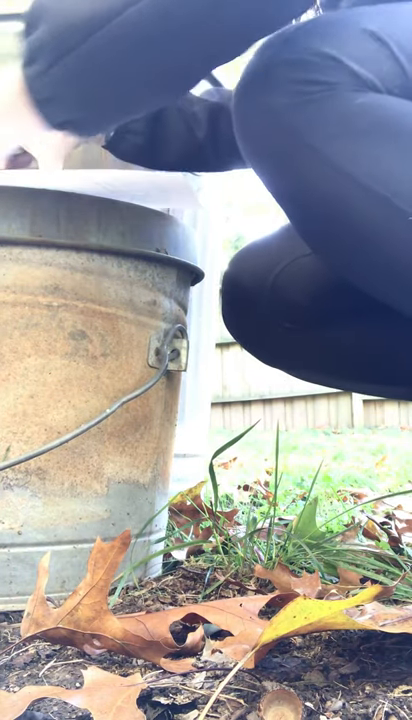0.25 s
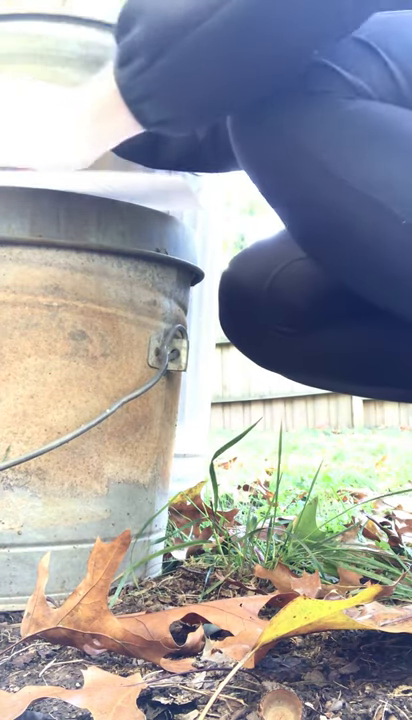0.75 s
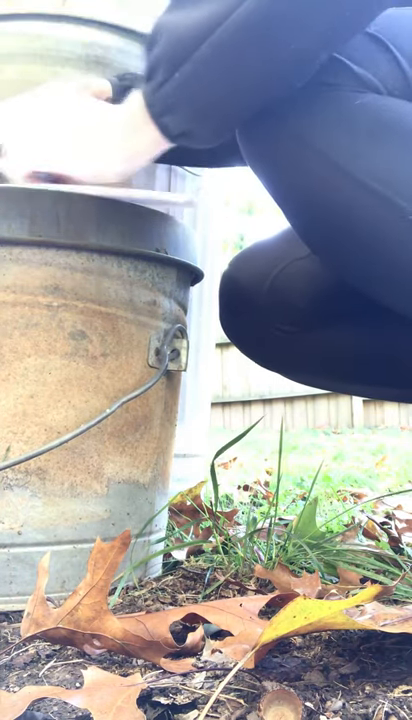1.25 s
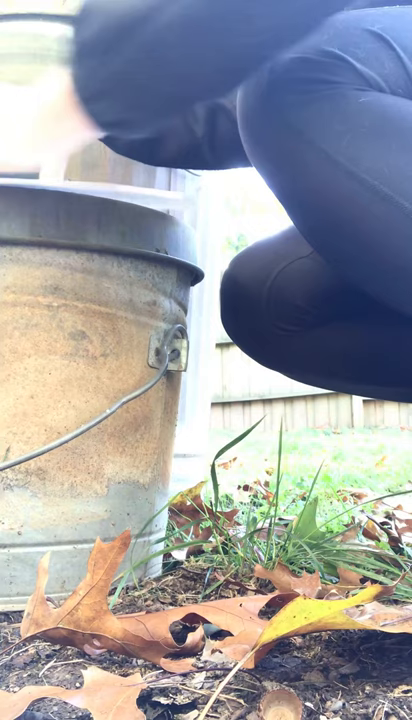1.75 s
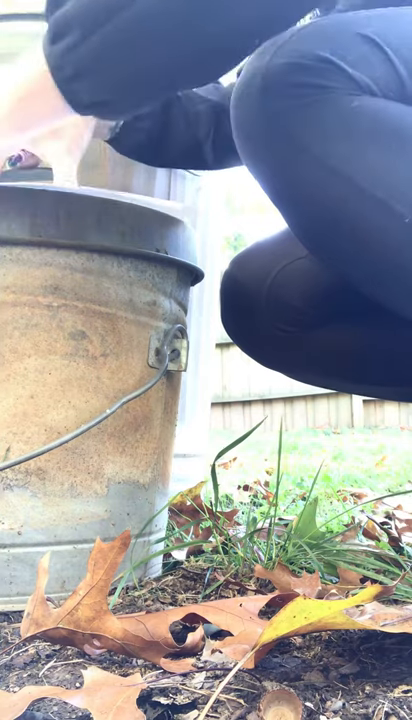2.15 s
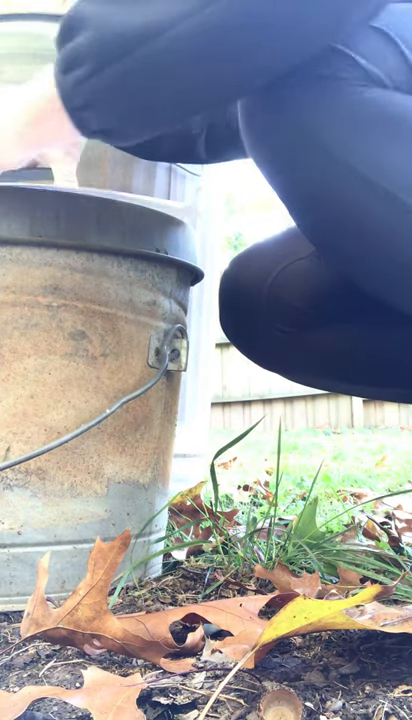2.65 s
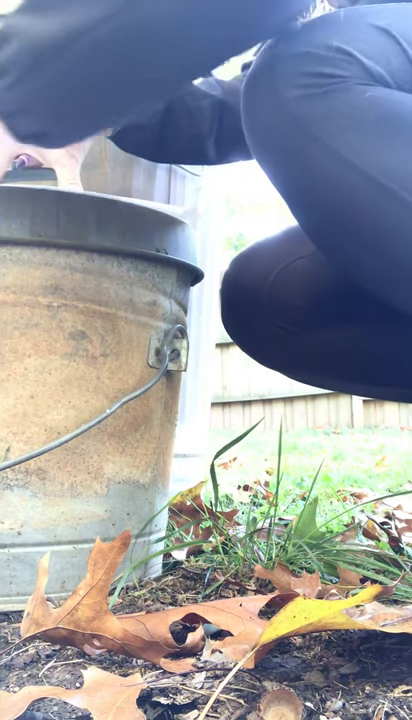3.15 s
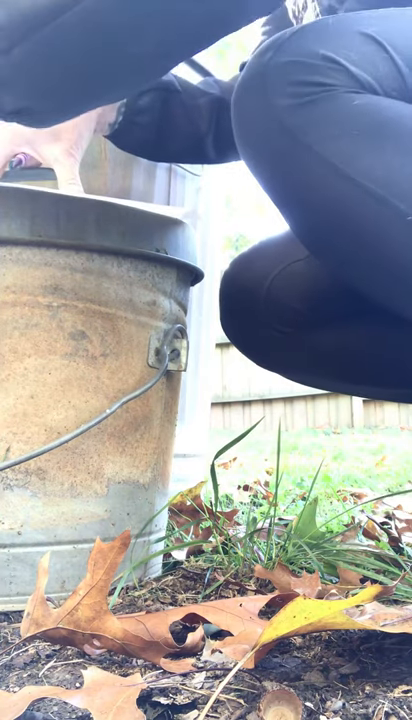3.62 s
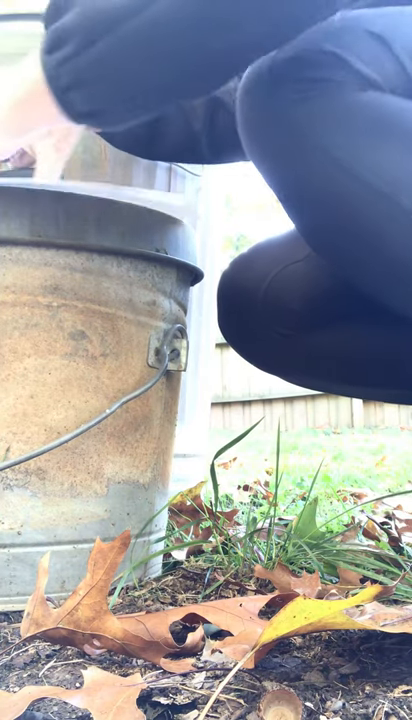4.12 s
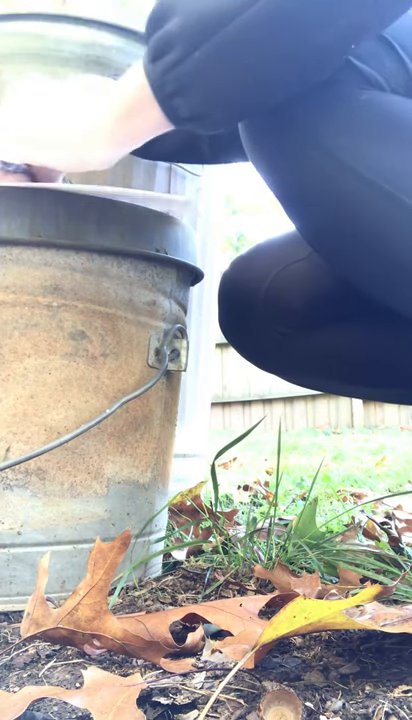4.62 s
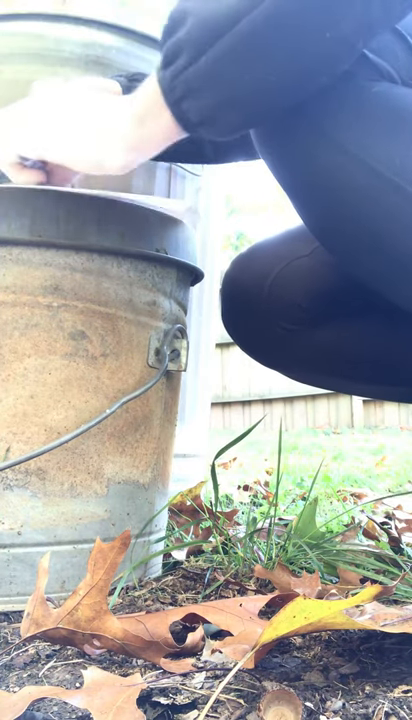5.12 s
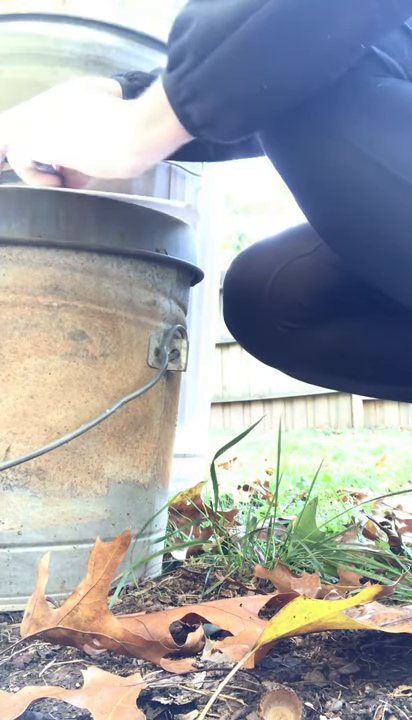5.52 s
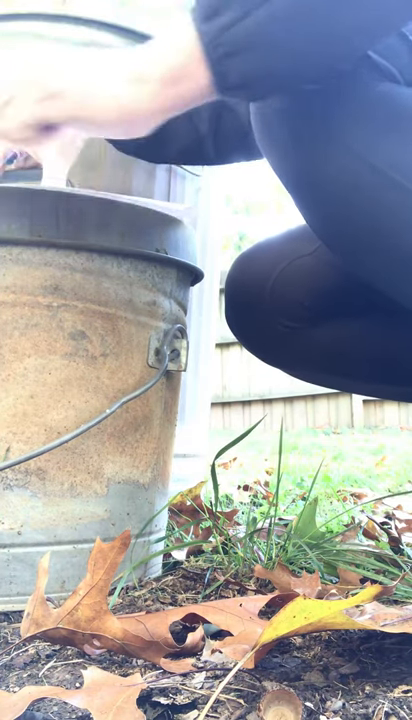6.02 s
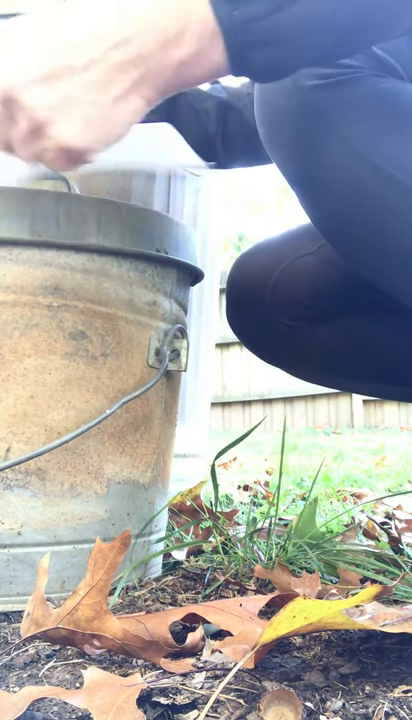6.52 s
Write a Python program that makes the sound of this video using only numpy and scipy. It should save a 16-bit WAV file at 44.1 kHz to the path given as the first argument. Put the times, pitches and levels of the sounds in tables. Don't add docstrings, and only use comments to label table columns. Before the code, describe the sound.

Close up outdoors, a crayon is rubbed in rapid strokes across paper on a metal bin lid, each a dry hiss with papery grit. Bumps knock the lid with dull, short hollow thumps. After about three seconds the strokes become short, spaced touch-ups, then harder knocks near the rim. Finally the sheet is peeled away with crisp crackles and snaps. Low traffic rumbles far behind.

```python
import sys
import numpy as np
from scipy import signal
from scipy.fft import rfft, irfft, next_fast_len
from scipy.io import wavfile

SR = 44100
rng = np.random.default_rng(int(sys.argv[2]) if len(sys.argv) > 2 else 0)


def volts(x):
    e = np.asarray(x, float) / 20
    return 10 ** e


def bounce(signal):
    frames = np.transpose(np.atleast_2d(signal))
    limited = np.clip(frames, -1, 1)
    pcm = np.round(limited * 32767).astype(np.int16)
    wavfile.write(sys.argv[1], SR, pcm)


N = 298557
MODE_FLICKER_DB = 1.5


def rms_one(x):
    return x / np.sqrt(np.mean(x ** 2) + 1e-20)


def in_time(rows):
    s, *columns = np.transpose(rows)
    return [np.interp(np.arange(N) / SR, s, c) for c in columns]


def coloured(x, spectrum):
    hz, level_db = np.transpose(spectrum)
    size = next_fast_len(N)
    bins_hz = np.arange(1, size // 2 + 2) * SR / size
    gain = volts(np.interp(np.log(bins_hz), np.log(hz), level_db))
    return rms_one(irfft(rfft(x, size) * gain, size)[:N])


def high_pass(x, hz):
    return signal.sosfilt(signal.butter(4, hz, "high", fs=SR, output="sos"), x)


def drift(rate):
    r = np.exp(-2 * np.pi * rate / SR)
    noise = rng.standard_normal(N + SR)
    return rms_one(signal.lfilter([1], [1, -2 * r, r * r], noise)[SR:])


def resonance(x, hz, width_hz):
    r = np.exp(-np.pi * width_hz / SR)
    top = np.array([1, 0, -1]) * (1 - r * r) / 2
    return signal.lfilter(top, [1, -2 * r * np.cos(2 * np.pi * hz / SR), r * r], x)


def body(x, modes, flicker_db=0.0):
    out = np.zeros(N)
    for k, (hz, width_hz, db) in enumerate(modes):
        out += (-1) ** k * volts(db + flicker_db * drift(13.0)) * resonance(x, hz, width_hz)
    return out


def grains(per_s, spread_db):
    sizes = volts(spread_db * np.minimum(rng.exponential(1, N), 5)) * rng.choice([-1, 1], N)
    return rms_one(sizes * (rng.random(N) < per_s / SR)) + 1e-9


def bursts(times, peaks, t60, rise_s):
    out, t = np.zeros(N), np.arange(int(.15 * SR)) / SR
    for at, peak, fall in np.broadcast((times * SR).astype(int), peaks, t60):
        shape = peak * (1 - np.exp(-t / rise_s)) * volts(-60 * t / fall)
        out[at:at + len(t)] += shape[:N - at]
    return out + 1e-12


def each_at_pitch(times, peaks, t60, drive, pitches_hz, width_hz):
    out, t = np.zeros(N), np.arange(int(.1 * SR)) / SR
    for at, peak, fall, hz in zip((times * SR).astype(int), peaks, t60, pitches_hz):
        part = drive[at:at + len(t)] * (peak * volts(-60 * t / fall))[:N - at]
        out[at:at + len(t)] += resonance(resonance(part, hz, width_hz), hz, 0.75 * width_hz)
    return out


# t/s, rumble level/dB, drone over rumble/dB
TRAFFIC = [(0.0, -51.5, 5), (0.32, -48, 0.5), (0.7, -53, 6), (1.15, -44, 2.5), (1.41, -40, -11),
           (1.55, -43, 2), (1.92, -40, 3), (2.13, -43, -3), (2.4, -43, 2), (3.05, -45.5, -6),
           (4.05, -41.5, 9), (4.4, -43, -7.5), (4.8, -41.5, 5.5), (5.2, -48.5, -8), (5.68, -50, 11.5),
           (5.84, -50, 1.5), (6.01, -47, 5.5), (6.77, -44, 1)]
# f/Hz, level/dB per Hz
RUMBLE = [(12, -20), (20, -2.5), (44, -6.5), (59, -1), (70, -3.5), (118, -6), (157, -16), (236, -19),
          (300, -21), (390, -25), (660, -120)]
DRONE_HZ, DRONE_WIDTH_HZ = 62.12, 4.1


def traffic():
    rumble_db, share_db = in_time(TRAFFIC)
    noise = rng.standard_normal(N + SR)
    drone = resonance(noise, DRONE_HZ, DRONE_WIDTH_HZ)
    drone = resonance(drone, DRONE_HZ, 1.45 * DRONE_WIDTH_HZ)[SR:]
    rumble = coloured(rng.standard_normal(N), RUMBLE)
    return volts(rumble_db + share_db) * rms_one(drone) + volts(rumble_db + 2.5) * rumble


# f/Hz, level/dB per Hz
AIR = [(88, -49), (150, 3.5), (217, -7.5), (327, -6.5), (785, -15.5), (917, -14), (1610, -18.5),
       (2430, -32), (3250, -25.5), (6810, -32), (10500, -54), (12500, -70), (15700, -62)]


def garden_air():
    return volts(-58.5) * coloured(rng.standard_normal(N), AIR)


TURN_S, SPEED_POWER = 0.075, 2.34


def strokes(rows, levels_db, builds_db=0.0, lag_s=0.0015):
    out = np.zeros(N + SR)
    for (start, length, *_), db in zip(rows, levels_db):
        t = np.arange(0, length, 1 / SR)
        to_turn = np.minimum(t, length - t) / min(TURN_S, length / 2)
        speed = np.sin(np.pi / 2 * np.clip(to_turn, 0, 1))
        at = int(start * SR)
        out[at:at + len(t)] += speed ** SPEED_POWER * volts(db + builds_db * (2 * t / length - 1.5))
    r = np.exp(-1 / (lag_s * SR))
    return signal.lfilter([1 - r], [1, -r], out[:N])


# t/s, length/s, wax hiss
# level/dB, grit level/dB, upper ring over grit/dB
STROKES = [(0.0, 0.062, -72, -54, -2.5), (0.076, 0.23, -65.5, -58, -0.5),
           (0.285, 0.17, -65.5, -62.5, -2), (0.451, 0.22, -62, -63, -7), (0.657, 0.13, -67.5, -61, -3),
           (0.796, 0.19, -67.5, -62.5, -1), (0.977, 0.13, -65, -69, -5), (1.082, 0.16, -60, -60.5, 4),
           (1.217, 0.082, -66, -67, 2), (1.314, 0.13, -66.5, -63, 1), (1.417, 0.061, -72.5, -70, 0),
           (1.522, 0.33, -61, -58.5, -1.5), (1.868, 0.21, -66, -64, 0), (2.084, 0.13, -78, -62, -6),
           (2.201, 0.21, -64.5, -59.5, -1), (2.409, 0.19, -68.5, -63, -8),
           (2.599, 0.26, -64, -64.5, 1), (2.796, 0.34, -60.5, -58, 5), (3.152, 0.15, -68.5, -65, -1),
           (3.7, 0.27, -66, -71.5, -9), (3.957, 0.095, -70, -78, 0), (4.15, 0.11, -67, -75, -9),
                 (4.385, 0.15, -66.5, -65.5, 6), (4.648, 0.1, -65, -72, 11), (4.893, 0.076, -70, -55.5, 6),
                 (5.078, 0.11, -85, -46.5, -11), (5.27, 0.073, -72, -57, 3.5), (5.465, 0.081, -68, -61, 6),
                 (5.611, 0.12, -66.5, -54.5, 2), (5.99, 0.032, -73, -54, -5), (6.108, 0.045, -77, -50, -6),
                 (6.141, 0.063, -56, -47.5, -3), (6.335, 0.07, -60, -56, 2),
                 (6.437, 0.18, -65, -67.5, 11.5), (6.617, 0.078, -68, -45.5, -4),
                 (6.674, 0.092, -59, -49.5, -2)]
# t/s, length/s, grit level/dB, upper ring over grit/dB
RELIEF = [
    (0.086, 0.13, -61.5, 6),
    (0.573, 0.08, -60, -6),
    (1.568, 0.15, -61.5, 6),
    (2.695, 0.1, -54, 7.5),
    (2.94, 0.24, -56.5, -4),
    (5.071, 0.04, -64, 5),
]
# t/s, glide level on the paper/dB, weight level on the lid/dB
HAND = [(0, -71, -51.5), (0.5, -77.5, -51.5), (1.0, -70.5, -52), (1.45, -73.5, -55), (2.0, -72.5, -55),
        (2.7, -70, -61), (3.4, -71.5, -53.5), (3.9, -72, -51), (4.4, -70, -52.5), (4.85, -71.5, -51),
        (5.2, -72.5, -44.5), (5.55, -73.5, -50), (5.9, -75.5, -54), (6.25, -72, -46), (6.77, -70, -51.5)]
GRIT_LAG_S, GRIT_BUILDS_DB = 0.026, 1.5
DRUM_LAG_S, DRUM_FOLLOWS, DRUM_DB = 0.029, 0.53, -51
REST_GRIT_DB, REST_RING_DB = -18.5, -2


def hand():
    rows = STROKES
    _, _, hiss_db, grit_db, ring_db = np.transpose(rows)
    _, _, rough_db, rough_ring_db = np.transpose(RELIEF)
    glide_db, weight_db = in_time(HAND)
    rest_db = weight_db + REST_GRIT_DB

    hiss = strokes(rows, hiss_db) + volts(glide_db)
    grit_level = strokes(rows, grit_db, GRIT_BUILDS_DB, GRIT_LAG_S) + volts(rest_db)
    grit_level += strokes(RELIEF, rough_db, lag_s=GRIT_LAG_S)
    ring = strokes(rows, grit_db + ring_db, GRIT_BUILDS_DB, 0.5 * GRIT_LAG_S) + volts(rest_db + REST_RING_DB)
    ring += strokes(RELIEF, rough_db + rough_ring_db, lag_s=0.005)
    stroke_drum_db = DRUM_DB + DRUM_FOLLOWS * (grit_db - grit_db.mean())
    drum = strokes(rows, stroke_drum_db, GRIT_BUILDS_DB, DRUM_LAG_S) + volts(weight_db)
    return 20 * np.log10([hiss, grit_level, ring, drum])


# f/Hz, level/dB per Hz
HISS = [(800, -16), (1300, -10), (2500, -0.5), (3300, -9), (4600, -6.5), (7000, -6.5), (9200, -5.5),
        (10500, -11), (12000, -7.5), (14500, -12), (15700, -7), (16000, -51)]


def wax_hiss(hiss_db):
    fine = coloured(grains(12000 * volts(2.0 * drift(80)), spread_db=0.5), HISS)
    middle, top = high_pass(fine, 6800), high_pass(fine, 10300)
    fine = fine + (volts(1.5 * drift(22)) - 1) * middle + (volts(2.6 * drift(10)) - 1) * top
    return volts(hiss_db + 2.0) * fine


# f/Hz, width/Hz, level/dB
PAPER_LOWER = [(1730, 35, 1), (1957, 100, 1), (2200, 33, 7), (2410, 58, 3), (2620, 89, 3),
               (2883, 310, -2.5)]
# f/Hz, width/Hz, level/dB
PAPER_UPPER = [(3270, 240, -12), (3530, 92, 0.5), (3790, 120, -3.5), (4210, 170, 1.5), (4680, 135, 1.5),
               (4920, 320, -6), (5020, 113, 3), (5460, 240, -2), (6840, 720, -9.5)]


def grit(grit_db, ring_db):
    slips = grains(4000 * volts(3.0 * drift(40)), spread_db=1.5)
    lower = rms_one(high_pass(body(slips, PAPER_LOWER, MODE_FLICKER_DB), 1330))
    upper = rms_one(high_pass(body(slips, PAPER_UPPER, MODE_FLICKER_DB), 3570))
    return volts(grit_db - 0.5) * lower + volts(ring_db - 3.5) * upper


# t/s, peak level/dB, edge level/dB, thump level/dB
KNOCKS = [(0.189, -36.5, -6, -8), (0.611, -37, -13, -2), (0.761, -53, -25, -21), (0.915, -29.5, -9.5, -14),
          (0.938, -48, -5, -24), (1.172, -32, -14, -2.5), (1.39, -33.5, -24, -4), (1.43, -37.5, -18, -12),
          (1.474, -61, -15, -21), (1.703, -40, -2.5, -21), (1.982, -38, -13, -21), (2.543, -44, -12, -6),
          (2.692, -35.5, -29, -8), (3.829, -42, -34, -3), (3.908, -40, -1, -12), (3.937, -40, -10, -8),
          (4.209, -38.5, -26, -16), (4.478, -41, -13, -3), (4.7, -39.5, -28, -8), (0.71, -47, -15, -15),
          (1.011, -35.5, -19, -15), (2.298, -45, -5, -6)]
# t/s, peak level/dB, edge level/dB, thump level/dB
RIM_KNOCKS = [(4.93, -30.5, -16, -5.5), (5.08, -34, -18, -9), (5.138, -35, -4, -2.5),
              (5.296, -30.5, -29, -13), (5.503, -38.5, -26, 0), (5.665, -34, -12, -35),
              (5.985, -37.5, -18, -14), (6.145, -38, -14, -2), (6.184, -42, -11, 1.5),
              (6.368, -36, -22, -9), (6.729, -38, 3.5, 0)]
# f/Hz, width/Hz, level/dB
LID = [(263, 42, -9.5), (313, 28.2, 0.5), (347.6, 29, 2), (431, 31, -5.5), (475, 24.4, -6), (548, 20, -9),
       (621, 23, -7.5), (747.4, 13, -13.5), (882, 71, -15), (1107, 130, -16.5), (1363, 300, -21)]
# f/Hz, width/Hz, level/dB
RIM = [(202, 30, 0), (501, 51, 0.5), (630, 40, -12)]
RATTLE_T60_S, RIM_T60_S = 0.1, 0.25


def lid(drum_db):
    s, peak_db, edge_db, thump_db = np.transpose([*KNOCKS, *RIM_KNOCKS])
    drumming = rms_one(body(grains(2000, spread_db=2.5), LID, MODE_FLICKER_DB))
    rattle = grains(3000, spread_db=1.8)

    strike = volts(9.5) * bursts(s, volts(peak_db), 0.005, 0.001)
    shake = bursts(s, volts(peak_db), RATTLE_T60_S, 0.0069) * rattle
    low = body(strike + shake, LID[:6], MODE_FLICKER_DB)
    edge = body(bursts(s, volts(peak_db + edge_db), RATTLE_T60_S, 0.011) * rattle, LID[6:], MODE_FLICKER_DB)

    thump_peak = volts(peak_db + thump_db)
    push = volts(-12.0) * bursts(s, thump_peak, 0.0094, 0.0017)
    thump = resonance(push + bursts(s, thump_peak, 0.33 * RATTLE_T60_S, 0.00094) * rattle, 165, 55)

    near = len(KNOCKS)
    rim = body(bursts(s[near:], volts(peak_db[near:]), RIM_T60_S, 0.011) * rattle, RIM)
    knocks = volts(18.0) * low + volts(31.0) * edge + volts(30.0) * thump + volts(12) * rim
    soft = signal.butter(2, 1500, fs=SR, output="sos")
    return signal.sosfilt(soft, volts(drum_db - 5.5) * drumming + knocks)


# f/Hz, width/Hz, level/dB
SNAP_LOW = [(1090, 200, -16.5), (1570, 62, -5), (2016, 114, -7), (2240, 94, -2), (2320, 250, -9.5),
            (2800, 290, -14.5)]
# f/Hz, width/Hz, level/dB
SNAP_HIGH = [(3420, 210, -1.5), (3840, 390, 2), (4440, 270, -0.5), (4600, 290, -4)]


def paper_cracks(rows):
    s, peak_db, pitch_hz, bright_db, t60, ring_db = np.transpose(rows)
    crackle = grains(6000, spread_db=2.5)
    low = body(bursts(s, volts(peak_db), t60, 0.0016) * crackle, SNAP_LOW)
    high = body(bursts(s, volts(peak_db + ring_db), t60, 0.00036) * crackle, SNAP_HIGH)
    pitched = each_at_pitch(s, volts(peak_db), t60, crackle, pitch_hz, 306)
    tick = bursts(s, volts(peak_db + bright_db), 0.75 * t60, 0.00033) * crackle
    tick = resonance(high_pass(tick, 4500), 5600, 6300)
    out = volts(15.5) * high_pass(low, 990) + volts(12.5) * high_pass(high, 3400)
    return out + volts(12.0) * pitched + volts(6.0) * tick


# t/s, peak level/dB, pitch f/Hz
CATCHES = [(0.112, -41.5, 2620), (0.76, -45.5, 2190), (1.0627, -42, 2200), (2.542, -42.5, 2340),
           (2.731, -49, 1870), (3.9001, -34.5, 1890), (3.9255, -43, 1890), (3.9494, -43, 1710),
           (3.9975, -53, 2160), (4.3271, -51.5, 2480), (4.489, -45, 1920), (4.9307, -46, 2170),
           (5.1228, -38, 2230), (5.139, -32.5, 2220), (5.504, -45, 2180), (5.9745, -48, 2030),
           (6.01, -40.5, 2290)]
CATCH_BRIGHT_DB, CATCH_T60_S, CATCH_RING_DB = -22, 0.032, -16


def catches():
    return paper_cracks([(*row, CATCH_BRIGHT_DB, CATCH_T60_S, CATCH_RING_DB) for row in CATCHES])


# t/s, peak level/dB, pitch f/Hz, brightness level/dB, crackle t60/s
SNAPS = [(6.112, -43.5, 2810, -2, 0.023), (6.144, -28, 2220, -34, 0.044), (6.1672, -29.5, 2375, -11, 0.063),
         (6.209, -36.5, 2260, -40, 0.032), (6.2845, -40.5, 1620, -34, 0.036),
         (6.348, -38.5, 1550, -16, 0.042), (6.3656, -24, 2280, -27, 0.028), (6.412, -36, 2090, -27, 0.021),
         (6.4487, -46, 2000, -28, 0.035), (6.472, -51, 2640, -14, 0.035), (6.499, -51, 2690, -7, 0.029),
         (6.5394, -48, 2110, -9, 0.03), (6.6465, -38, 2050, -21, 0.14), (6.663, -20, 2350, -29.5, 0.046),
         (6.7103, -29.5, 2240, -23, 0.032), (6.734, -34, 2150, -14, 0.031), (6.7494, -27, 2200, -17, 0.026)]
SNAP_RING_DB, RING_FOLLOWS = -3.5, 0.25


def snaps():
    return paper_cracks([(*row, SNAP_RING_DB + RING_FOLLOWS * row[3]) for row in SNAPS])


def scene():
    hiss_db, grit_db, ring_db, drum_db = hand()
    far = traffic() + garden_air()
    rubbing = wax_hiss(hiss_db) + grit(grit_db, ring_db) + lid(drum_db)
    return (far + rubbing + catches() + snaps())[None]


def band_limit(x):
    return signal.sosfilt(signal.butter(12, 15890, fs=SR, output="sos"), x)


def record(dry):
    top_cut = signal.cheby2(10, 50, 16400, fs=SR, output="sos")
    heard = signal.sosfilt(top_cut, high_pass(dry, 35.0))
    return band_limit(heard)


dry = scene()
out = record(dry)
bounce(out)
```